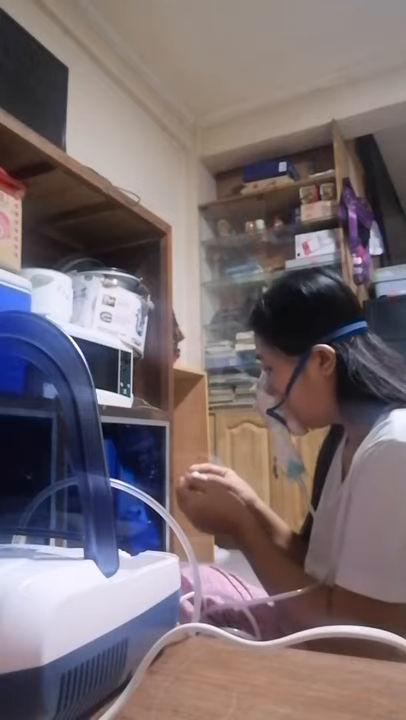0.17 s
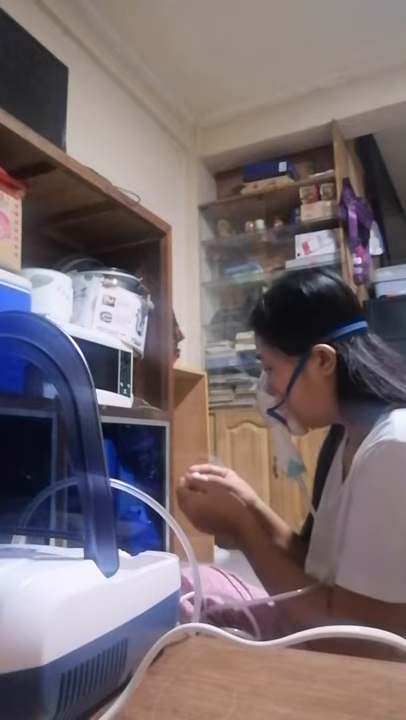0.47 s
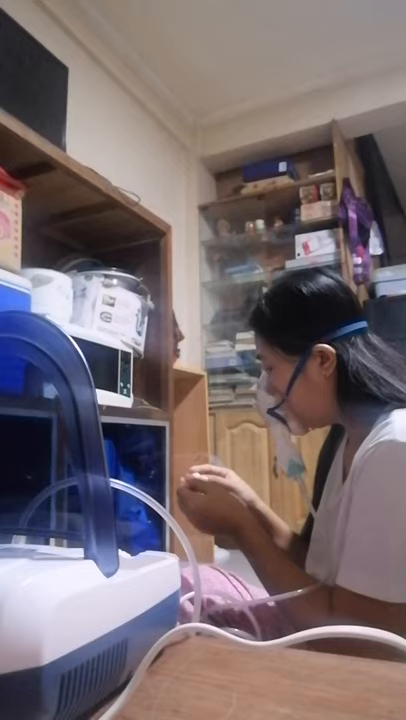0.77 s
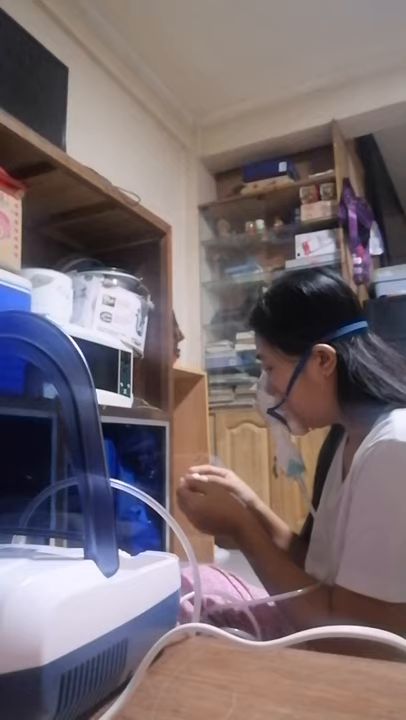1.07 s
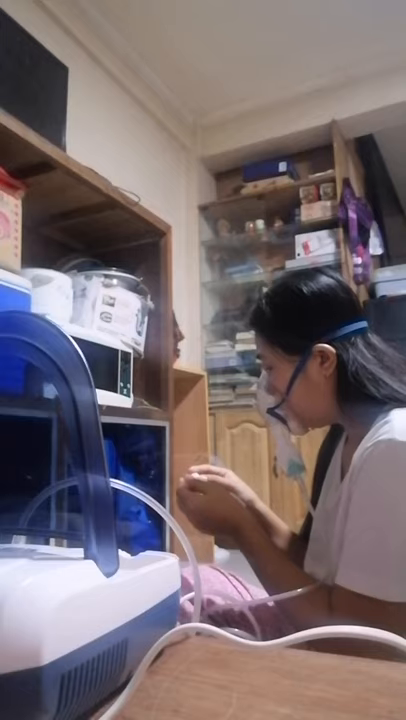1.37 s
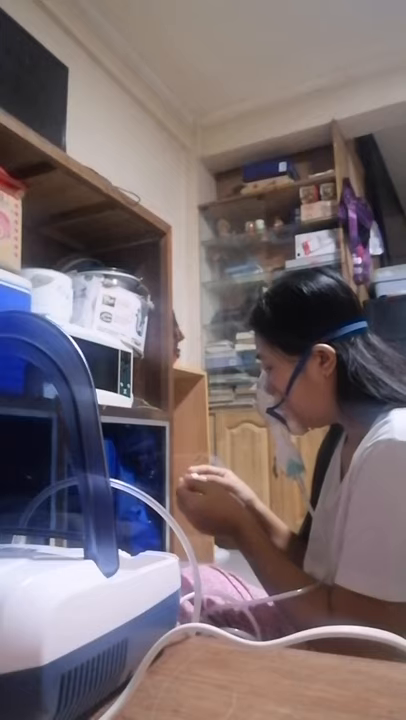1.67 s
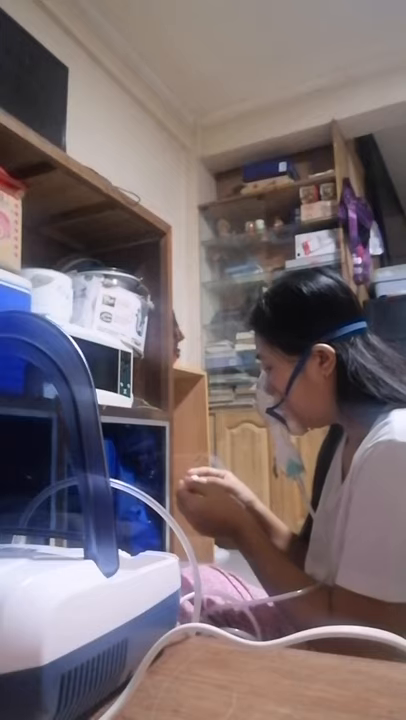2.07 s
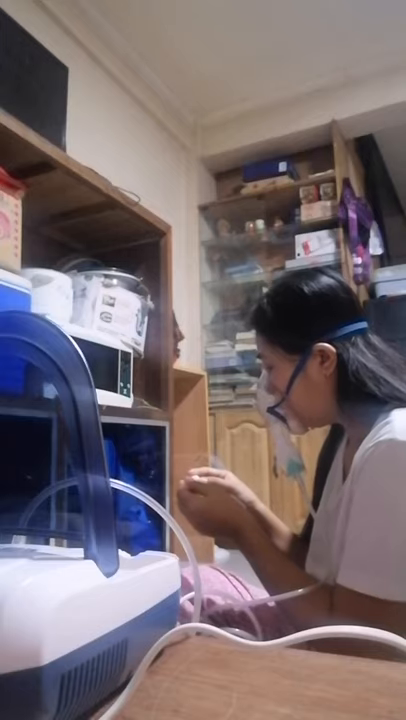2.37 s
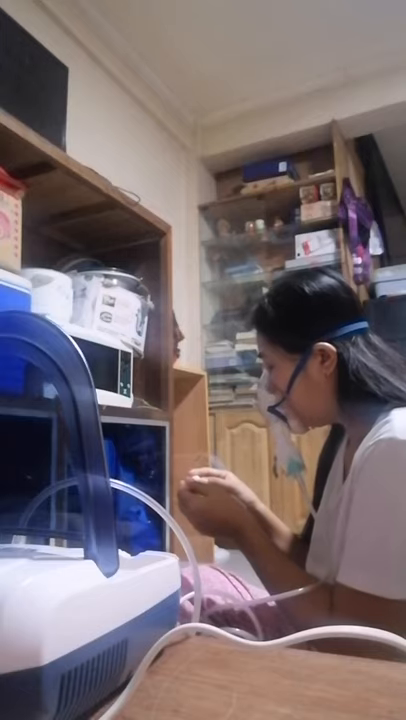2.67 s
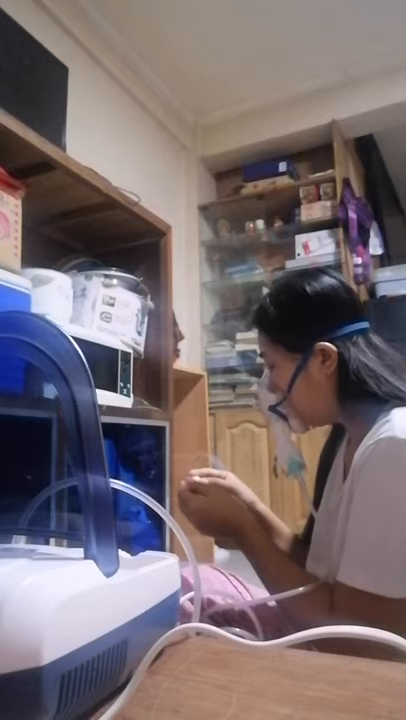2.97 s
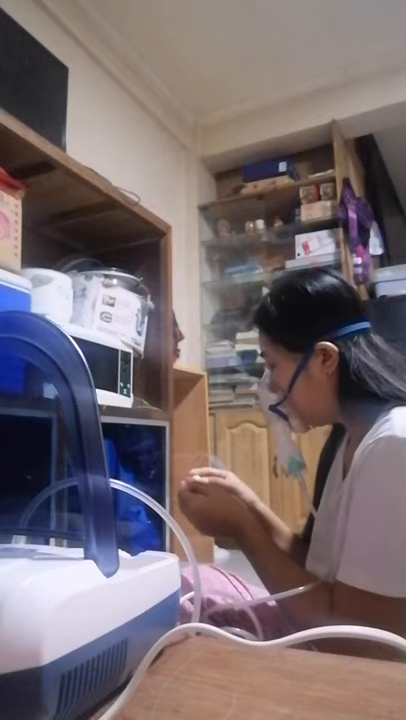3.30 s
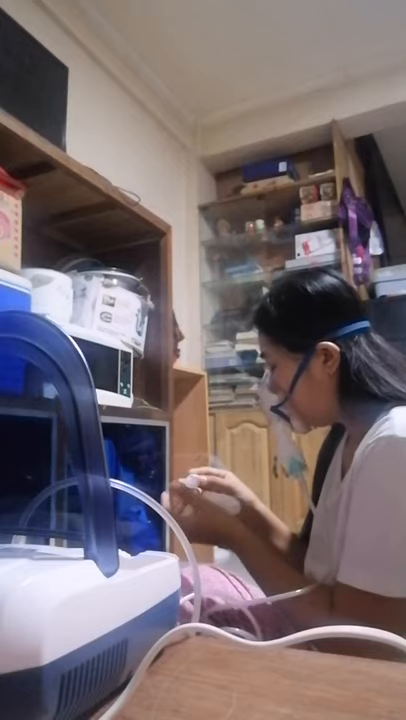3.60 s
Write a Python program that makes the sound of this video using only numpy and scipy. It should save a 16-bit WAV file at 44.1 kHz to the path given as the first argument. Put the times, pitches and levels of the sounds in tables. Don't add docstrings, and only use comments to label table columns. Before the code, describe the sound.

Close stereo phone pickup, stronger on the right: a nebulizer's low motor hum and hard plastic buzz run unbroken, with sputtering jet hiss and tiny crackling droplets, and slight reflections from nearby shelves.

```python
import sys
import numpy as np
from scipy import signal
from scipy.fft import rfft, irfft
from scipy.io import wavfile
from scipy.ndimage import uniform_filter1d

SR = 44100
rng = np.random.default_rng(int(sys.argv[2]) if len(sys.argv) > 2 else 0)


def volts_from_db(level):
    exponent = np.asarray(level, float) / 20
    return 10 ** exponent


def master(y):
    cut = np.clip(np.atleast_2d(y).T, -1, 1)
    pcm = np.round(cut * 32767)
    wavfile.write(sys.argv[1], SR, pcm.astype(np.int16))


N = 164934
TIME_S = np.arange(N) / SR

SHAFT_HZ, MAINS_HZ = 56.1485, 120.405
PUFF_TURN = 0.62


def evened(x):
    return x / np.sqrt(np.mean(x ** 2) + 1e-20)


def slow(rate_hz, count):
    spectrum = rfft(rng.standard_normal(count))
    hz = np.arange(len(spectrum)) * SR / N
    return evened(irfft(spectrum / (1 + (hz / rate_hz) ** 2), count))


def later(x):
    lag_s = 0.000224
    hz = np.fft.rfftfreq(N, 1 / SR)
    return irfft(rfft(x) * np.exp(-2j * np.pi * hz * lag_s), N)


def noise(gain, same, size):
    shared, own = rng.standard_normal((2, N))
    left = same * later(shared) + np.sqrt(1 - same ** 2) * own
    pair = np.array([left, shared]) * np.sqrt(SR / 2)
    overlap = size - size // 4
    hz, t, z = signal.stft(pair, SR, nperseg=size, noverlap=overlap)
    return signal.istft(z * gain(hz, t), SR, nperseg=size, noverlap=overlap)[1][:, :N]


def colour(table, hz):
    table_hz, right_db, left_db = np.transpose(table)
    levels_db = [np.interp(np.log(hz + 1), np.log(table_hz), db, right=-130) for db in (left_db, right_db)]
    return volts_from_db(levels_db)[:, :, None]


def beat(turn):
    return 2 * np.pi * ((MAINS_HZ - 2 * SHAFT_HZ) * TIME_S + turn)


def shaft():
    first_stroke_s, wobble_rad, wander_rad = 0.0111, 0.016, 0.025
    steady = 2 * np.pi * SHAFT_HZ * (TIME_S - first_stroke_s)
    return steady + wobble_rad * np.sin(beat(0.33)) + wander_rad * slow(2.9, N)


# shaft_multiple, right_level_db, left_minus_right_db
STROKE_TONES = [(1, -31, -3), (2, -42, -3), (3, -34, -8), (4, -45, -12), (5, -39, -10), (6, -44, -10),
                (7, -39, -11), (8, -30, -11), (9, -20, -12), (10, -33, -11), (11, -35, -13), (12, -47, -12),
                (13, -39, -9), (14, -53, -7), (15, -51, -30), (16, -61, -4), (17, -51, -3), (18, -47, -7),
                (19, -51, 1), (20, -46, -2), (21, -52, -4), (22, -58, -5), (23, -61, 0), (24, -53, -5),
                (25, -67, 3), (26, -77, 4), (28, -68, 0), (32, -73, -4), (34, -60, -6), (35, -63, -14)]


def piston(angle):
    surge_db, uneven_db = 0.12, 0.57
    scattered = 13
    multiples, right_db, _ = np.transpose(STROKE_TONES)
    full_db = np.interp(np.arange(65), multiples, right_db)
    mirrored = np.r_[full_db, full_db[-2:0:-1]]
    lag = np.pi - np.imag(signal.hilbert(np.log(volts_from_db(mirrored))))
    lag[[2, 3]] += np.pi
    lag[scattered + 1:] = rng.uniform(0, 2 * np.pi, len(lag) - scattered - 1)
    surge = surge_db * np.sin(beat(0.75))
    shade_rad = np.array([[1.18], [0]])
    out = np.zeros((2, N))
    for n, db, tilt_db in STROKE_TONES:
        sway_db = n / 9 * surge + uneven_db * min(n / 9, 1.3) * slow(20, N)
        phase = n * angle + lag[int(n)] - shade_rad * np.tanh((n / 7.3) ** 2)
        out += np.sqrt(2) * volts_from_db(db + sway_db) * np.cos(phase) * volts_from_db([[tilt_db], [0]])
    return out


# shaft_multiple, mains_sign (+1 added, -1 taken), right_level_db, left_minus_right_db
MAINS_TONES = [(0, 1, -35, -6), (1, 1, -50, -10), (3, 1, -59, -12), (8, -1, -60, -10), (14, -1, -51, -11),
               (16, -1, -53, -8), (17, 1, -53, 0)]


def mains_hum(angle):
    pull = 2 * np.pi * (MAINS_HZ * TIME_S + 0.69)
    out = np.zeros((2, N))
    for n, sign, db, tilt_db in MAINS_TONES:
        out += np.sqrt(2) * volts_from_db(db) * np.cos(sign * pull + n * angle) * volts_from_db([[tilt_db], [0]])
    return out


# pitch_hz, right_level_db (per Hz), left_level_db (per Hz)
RATTLE_COLOUR = [(30, -70, -76), (312, -70, -86.5), (510, -66.5, -86), (645, -68.5, -71), (850, -70.5, -76),
                 (1170, -69, -76), (1400, -84, -80.5), (2270, -83, -105)]


def rattle(angle):
    shake = noise(lambda hz, t: colour(RATTLE_COLOUR, hz), same=0.64, size=2048)
    return shake * evened(1 + 0.69 * np.cos(angle - 1.0))


def puff(angle, turn):
    puff_db, sharpness = 2, 3
    bump = np.exp(sharpness * (np.cos(angle - 2 * np.pi * turn) - 1))
    return evened(volts_from_db(puff_db * bump))


# pitch_hz, right_level_db (per Hz), left_level_db (per Hz)
HISS_COLOUR = [(1500, -90, -96), (3090, -82.5, -98.5), (3670, -77, -119), (5100, -77.5, -83),
               (7170, -76.5, -90.5), (10070, -81.5, -90), (11900, -86.5, -88.5), (15130, -94.5, -106)]


def hiss(angle):
    patch_db = 1.5

    def gain(hz, t):
        patches = uniform_filter1d(rng.standard_normal((len(hz), len(t))), 8, 0)
        patches = uniform_filter1d(patches, 16, 1)
        rise = np.minimum(hz / 1500, 1)[:, None] ** 4
        return colour(HISS_COLOUR, hz) * rise * volts_from_db(patch_db * evened(patches))

    return noise(gain, same=0.067, size=512) * puff(angle, PUFF_TURN)


# pitch_hz, width_hz, right_level_db (per Hz), left_level_db (per Hz), sputter_db
WHISTLES = [(1910, 250, -78, -83, 1), (2550, 200, -81, -89, 1), (4580, 300, -73.5, -83, 2.5),
            (5430, 300, -74, -86, 2), (6550, 250, -71, -76, 3.5), (6850, 750, -70, -83, 3.5),
            (8330, 300, -77, -92, 4), (9050, 400, -83, -92, 4), (10500, 300, -84, -85, 1),
            (11900, 500, -87, -88, 1)]
# start_s, flow_db
LIQUID = [(0.0, -52), (0.02, -41), (0.17, -58), (0.28, -29), (0.68, -52), (0.75, -41), (0.92, -63),
          (0.96, -44), (1.63, -50), (1.7, -40), (2.24, -51.5), (2.28, -39), (2.71, -50), (2.78, -40),
          (3.13, -53), (3.32, -42.5), (3.63, -57), (3.74, -35)]


def jet(angle):
    flow_mean_db, flow_share, sputter_top_db = -46.5, 0.73, 8
    start_s, flow_db = np.transpose(LIQUID)

    def gain(hz, t, rows):
        flow = (np.interp(t, start_s, flow_db) - flow_mean_db) / 3
        power = 0
        for f, width, right_db, left_db, sputter_db in rows:
            shape = 1 / (1 + (2 * (hz - f) / width) ** 2) ** 2
            level_db = sputter_db * (1.67 * slow(33, len(t)) + flow_share * (f < 8000) * flow)
            level_db = sputter_top_db * np.tanh(level_db / sputter_top_db)
            sides = volts_from_db(2 * np.array([left_db, right_db]))[:, None, None]
            power = power + sides * shape[:, None] * volts_from_db(2 * level_db)
        return np.sqrt(power)

    early_rows = WHISTLES[:6] + WHISTLES[8:]
    late_rows = WHISTLES[6:8]
    early = noise(lambda hz, t: gain(hz, t, early_rows), same=0.88, size=512)
    late = noise(lambda hz, t: gain(hz, t, late_rows), same=1.0, size=512)
    return early * puff(angle, PUFF_TURN) + late * puff(angle, 0.39)


def fizz():
    level_db, drops_per_s, pitch_hz, spread_db = -45.5, 2500, 8800, 2
    spray_db, spray_hz = 20, 15
    rate = drops_per_s * volts_from_db(spray_db * np.tanh(slow(spray_hz, N) / 2))
    size = volts_from_db(spread_db * np.minimum(rng.exponential(1, N), 4))
    drops = size * (rng.random(N) < rate / SR)
    kind = rng.integers(0, 16, N)
    t = np.arange(44) / SR
    out = np.zeros(N)
    for k, hz in enumerate(pitch_hz * np.geomspace(0.92, 1.08, 16)):
        burst = np.sin(2 * np.pi * hz * t) * np.hanning(44)
        out += signal.oaconvolve(drops * (kind == k), burst)[:N]
    return volts_from_db(level_db) * evened(out) * volts_from_db([[-17], [0]])


def room(x):
    level_db, fade_60db_s = -11, 0.15
    t = np.arange(4000) / SR
    taps = rng.standard_normal((2, 4000)) * (rng.random((2, 4000)) < 0.05)
    taps = taps * volts_from_db(-60 * t / fade_60db_s)
    taps = volts_from_db(level_db) * taps / np.linalg.norm(taps, axis=1, keepdims=True)
    echoes = signal.fftconvolve(x, taps, axes=1)[:, :N]
    return (x + echoes) / np.sqrt(1 + volts_from_db(2 * level_db))


def scene():
    angle = shaft()
    machine = piston(angle) + mains_hum(angle) + rattle(angle)
    return machine + room(hiss(angle) + jet(angle) + fizz())


# pitch_hz, width_hz, right_level_db, left_level_db
DIPS = [(1620, 200, -4, -2), (3100, 300, -4, -3), (3850, 300, 0, -4), (4100, 200, -4, -1),
        (11400, 350, -8, -5), (13550, 600, -5, -1)]


def ports(x):
    hz = np.fft.rfftfreq(N, 1 / SR)
    dips_db = np.zeros((2, len(hz)))
    for f, width, right_db, left_db in DIPS:
        dips_db += np.array([[left_db], [right_db]]) * np.exp(-(2 * (hz - f) / width) ** 2)
    return irfft(rfft(x) * volts_from_db(dips_db), N)


def low_pass(x):
    return signal.sosfilt(signal.butter(12, 15190, fs=SR, output="sos"), x)


def record(dry):
    return low_pass(ports(dry))


dry = scene()
out = record(dry)
master(out)
```